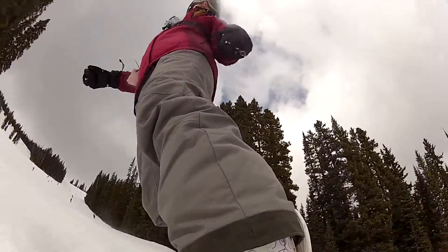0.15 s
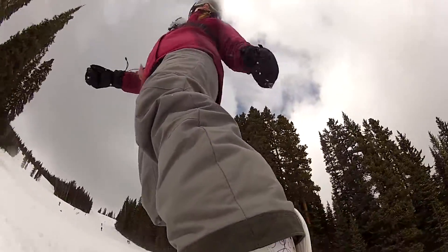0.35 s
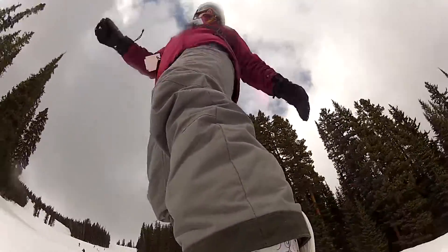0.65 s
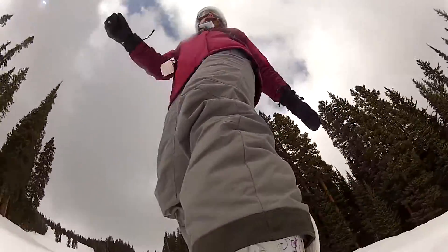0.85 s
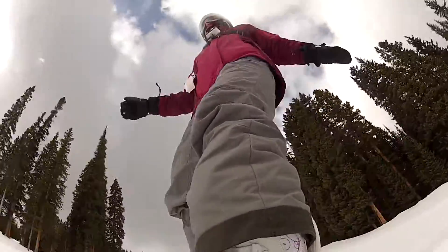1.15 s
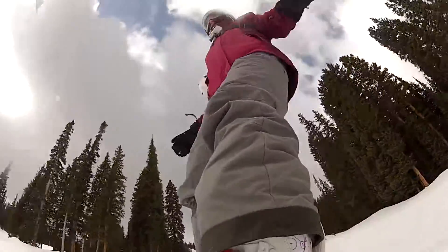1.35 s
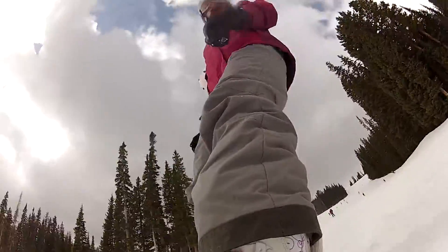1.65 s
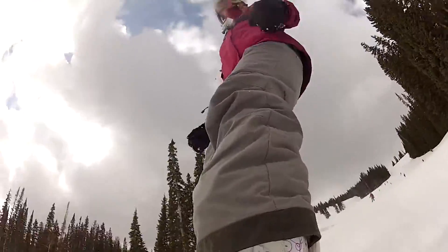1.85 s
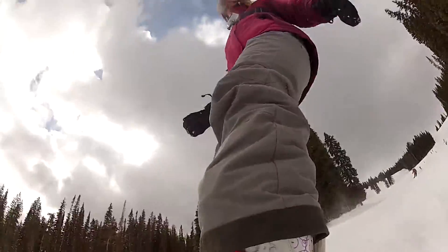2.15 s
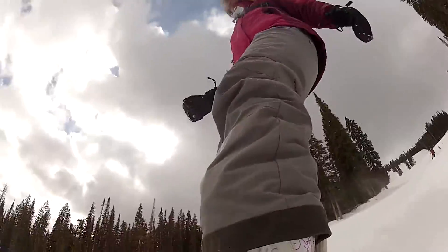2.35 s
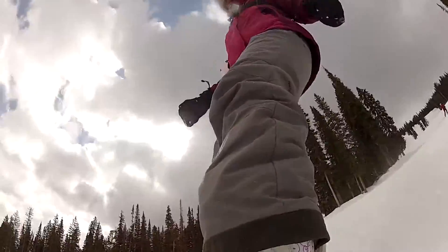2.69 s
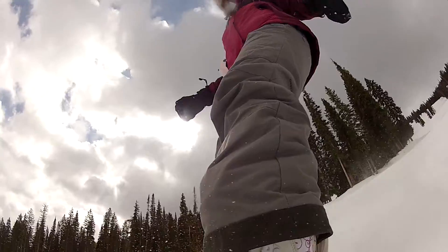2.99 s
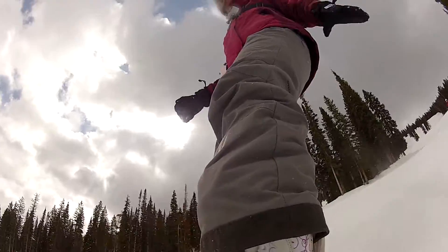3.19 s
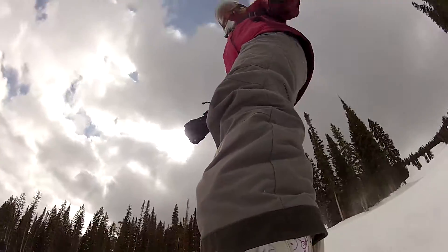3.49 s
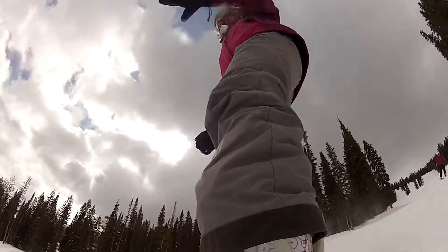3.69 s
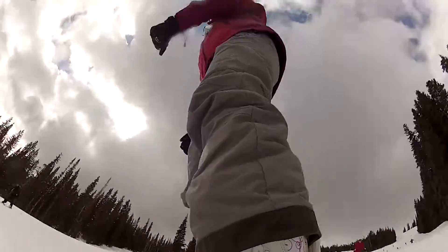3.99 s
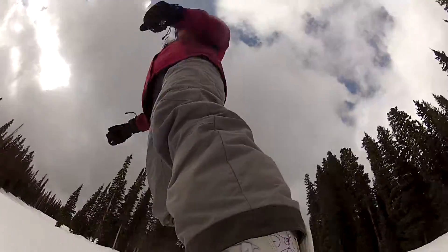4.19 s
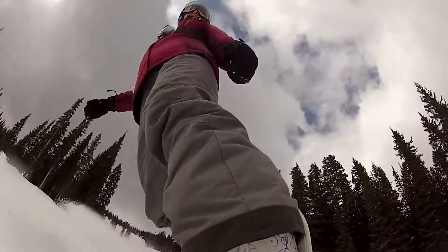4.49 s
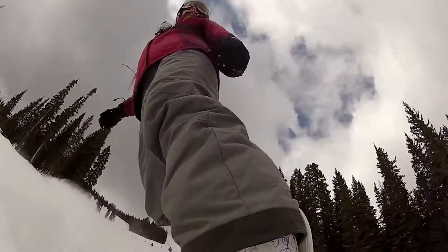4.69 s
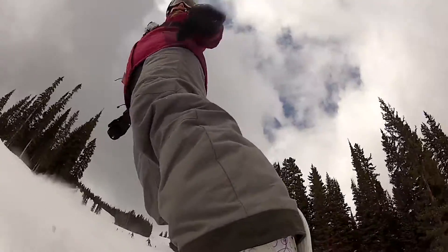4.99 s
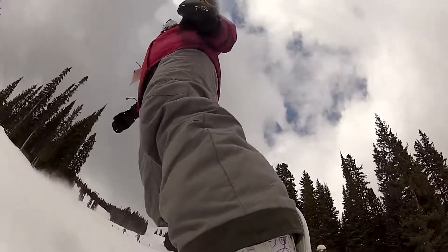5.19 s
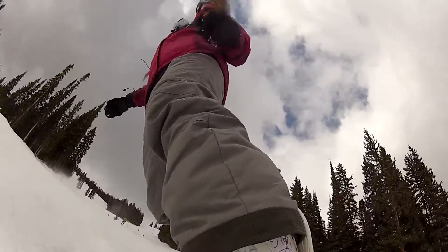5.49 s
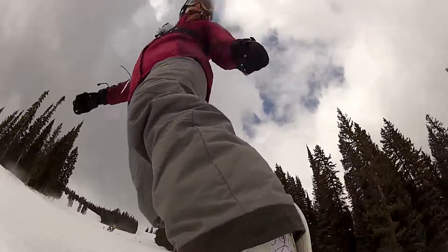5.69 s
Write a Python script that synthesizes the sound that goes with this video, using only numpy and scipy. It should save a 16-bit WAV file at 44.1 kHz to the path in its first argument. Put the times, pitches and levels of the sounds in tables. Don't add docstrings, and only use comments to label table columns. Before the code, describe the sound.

A snowboard edge scrapes harshly over crusty snow, with deep deck rumble, wind buffeting, low thumps and sharp icy clicks, heard from a sealed board-mounted camera.

```python
import sys
import numpy as np
from scipy import signal
from scipy.fft import rfft, irfft, next_fast_len
from scipy.io import wavfile
from scipy.ndimage import uniform_filter1d, minimum_filter1d, map_coordinates

SR = 44100
rng = np.random.default_rng(int(sys.argv[2]) if len(sys.argv) > 2 else 0)


def decibels_to_gain(level_db):
    exponent = np.asarray(level_db, float) / 20
    return 10 ** exponent


def persist_wave(psi):
    counts = np.round(np.clip(psi, -1, 1) * 32767).astype(np.int16)
    wavfile.write(sys.argv[1], SR, np.atleast_2d(counts).T)


N = 257984
TIME = np.arange(N) / SR

# time_s, scrape_db
EDGE_PRESSURE = [(0.0, -19.5), (0.53, -16.5), (1.06, -24), (1.6, -16), (2.13, -20), (2.66, -20),
                 (3.19, -23), (3.72, -21), (4.25, -21), (4.79, -22), (5.32, -20), (5.85, -18.5)]
# start_s, length_s, gain_db
SURGES = [(0.03, 0.018, 1), (0.055, 0.14, 3), (0.845, 0.077, 3), (1.035, 0.026, 13), (1.175, 0.054, 9.5),
          (2.05, 0.067, 2), (2.315, 0.17, 1.5), (2.335, 0.056, 9), (2.435, 0.057, 5.5), (2.59, 0.022, 1),
          (2.87, 0.083, 5.5), (2.885, 0.23, 6), (3.04, 0.12, 3.5), (3.295, 0.14, 5), (3.46, 0.075, 3.5),
          (3.47, 0.13, 4.5), (3.555, 0.041, 0), (3.7, 0.055, 2.5), (3.775, 0.091, 3), (3.875, 0.088, 5.5),
          (4.04, 0.025, 8), (4.34, 0.017, 8.5), (4.46, 0.15, 8), (4.66, 0.028, 6), (4.715, 0.033, 5.5),
          (4.86, 0.025, 1.5), (4.905, 0.022, 4), (5.12, 0.1, 6.5), (5.24, 0.057, 6), (5.395, 0.042, 6)]
# start_s, length_s, loss_db
SKIPS = [(0.31, 0.1, 3), (0.485, 0.059, 4), (0.51, 0.13, 13), (0.62, 0.097, 3.5), (0.94, 0.033, 0.5),
         (1.005, 0.032, 4.5), (1.105, 0.049, 4), (1.355, 0.1, 2), (1.455, 0.063, 12), (1.53, 0.075, 3.5),
         (2.9, 0.033, 6), (4.525, 0.035, 6.5), (5.17, 0.013, 8), (3.535, 0.016, 1), (3.765, 0.017, 3.5),
         (5.615, 0.022, 3), (4.49, 0.011, -1), (1.585, 0.14, 2.5), (1.695, 0.051, 8.5), (1.825, 0.11, 4),
         (1.935, 0.033, 11.5), (2.0, 0.037, 11), (2.245, 0.091, 5.5), (2.79, 0.043, 5.5), (2.86, 0.015, 12),
         (3.17, 0.11, 3.5), (4.02, 0.29, 6.5), (4.065, 0.025, 5.5), (4.2, 0.071, 6.5), (4.365, 0.065, 9.5),
         (4.745, 0.076, 10.5), (4.82, 0.038, 4), (4.93, 0.1, 7), (5.09, 0.019, 8), (5.455, 0.21, 10),
         (5.745, 0.045, 5), (5.805, 0.018, 11)]
# time_s, drum_db
DECK_LOAD = [(0.0, -27.5), (0.45, -23.5), (0.9, -14.5), (1.35, -13.5), (1.8, -14.5), (2.25, -18),
             (2.7, -24), (3.15, -20.5), (3.6, -25.5), (4.05, -17), (4.5, -22), (4.95, -18), (5.4, -29),
             (5.85, -15)]
# start_s, length_s, gain_db
HEAVES = [(0.475, 0.12, -3), (0.67, 0.1, 5), (1.59, 0.099, 1), (1.86, 0.38, 4), (2.185, 0.04, -1),
          (2.22, 0.053, 11.5), (2.36, 0.09, 3), (2.75, 0.064, 4), (2.845, 0.069, 2), (3.21, 0.1, 3.4),
          (3.3, 0.14, 10), (3.655, 0.15, 6), (3.86, 0.076, 4), (4.255, 0.15, 5), (4.435, 0.089, 9.5),
          (5.06, 0.36, 6.5), (5.375, 0.064, 12), (5.565, 0.036, 5), (5.6, 0.097, 4), (5.75, 0.052, 5)]
# start_s, length_s, loss_db
LULLS = [(0.17, 0.069, 5), (0.335, 0.06, 1), (0.58, 0.076, 4), (0.815, 0.16, 3.5), (0.93, 0.11, 11),
         (1.08, 0.037, 13), (1.09, 0.16, 7.5), (1.19, 0.15, 6), (1.385, 0.065, 5.5), (1.47, 0.046, 9),
         (1.51, 0.12, 1), (1.755, 0.079, 6), (1.855, 0.057, 5), (3.0, 0.24, 9), (4.0, 0.12, 13.5),
         (4.11, 0.081, 14), (4.52, 0.15, 1), (4.925, 0.15, 13.5)]
# start_s, length_s, change_db
GUSTS = [(0.0, 0.15, 2.5), (0.08, 0.09, -2), (0.32, 0.1, 1), (0.53, 0.12, 8), (0.775, 0.12, -5),
         (0.85, 0.099, 11.5), (1.065, 0.2, -4), (1.215, 0.14, -0.5), (2.08, 0.15, -8), (2.26, 0.14, 3.5),
         (2.4, 0.27, -2), (1.98, 0.1, -3), (2.955, 0.13, -2.9), (3.14, 0.22, -3), (3.52, 0.33, -5),
         (3.755, 0.36, 3), (4.155, 0.11, -7), (4.225, 0.087, 13), (4.915, 0.058, 8), (4.925, 0.15, 4),
         (5.56, 0.095, 1)]
# time_s, weight_db
LEAN = [(0, -0.5), (.6, -2), (1.2, -3), (1.6, 0.5), (2.1, 2.5), (2.7, 3), (3.2, -1), (3.9, 0), (4.2, -1),
        (4.7, 0.5), (5.3, 0.5), (5.85, 0.5)]
# time_s, extra_brightness_db
CRUST = [(0, -3), (.5, -2.5), (.72, 3.5), (1.0, 2.5), (1.8, -2), (2.4, 0), (2.7, -4), (3.05, 0.5),
         (3.7, -4), (4.2, 3), (4.6, -1), (5.85, -1)]

# start_s, peak_db, ring_hz, knock_db
BUMPS = [(0.69, 1, 86, -29), (0.884, 3.5, 48.4, -36), (0.892, -6, 61, -15), (0.919, 2.5, 145, -38),
         (1.018, 2, 147, -41), (1.05, 8, 109, -40), (1.214, 0, 177, -17), (1.444, 5, 135, -33),
         (1.595, 5, 200, -33), (2.07, 2, 187, -27), (2.045, -5, 260, -27), (2.755, -17, 66.4, -30),
         (3.19, -7, 190, -38), (3.646, -19, 154, -36), (3.971, 1, 190, -34), (4.0938, 4.5, 143, -35),
         (4.211, -1, 187, -37), (4.27, -7, 110, -37), (4.3, 0, 130, -32), (4.329, -1, 185, -33),
         (4.489, -1, 76, -15), (5.059, -15, 68, -36), (5.1, -1.5, 81.6, -24), (5.183, -9, 78.1, -13.5),
         (5.391, -5, 162, -14), (5.51, -5.5, 140, -38), (5.594, 1, 67.6, -31), (5.769, 0, 188, -23),
         (5.781, -1, 75, -30), (0.699, -2, 101, -37), (1.632, -2, 80, -35), (1.693, -0.5, 98, -35),
         (1.922, -1.5, 110, -35), (3.882, -1, 130, -35), (2.47, -3.5, 148, -37), (2.2444, 10.5, 150, -13),
         (4.261, 0, 100, -35), (4.36, -3, 50, -35), (0.74, -3, 59.5, -37), (5.648, -1, 121, -35),
         (4.466, -3, 121, -35)]
# start_s, peak_db, ring_hz, knock_db
ROLLS = [(0.257, -13, 205, -21), (0.304, -7.5, 193, -25), (0.449, -9, 168, -28), (0.505, -4, 183.6, -43),
         (1.343, 6.5, 150.3, -42), (1.3, -2, 157, -42), (0.802, -2, 197, -35), (1.06, -1, 127, -40),
         (1.73, -15, 154, -30), (1.915, 1, 184, -28), (2.211, 0, 155, -33), (2.261, -6.5, 149, -40),
         (3.214, -11, 82.4, -36), (3.33, -2.5, 198, -24), (3.361, -1, 190, -24), (3.873, -1.5, 94.3, -32),
         (4.147, -3.5, 143, -50), (4.453, 1.5, 178.4, -19), (4.644, -7, 175, -22)]
# start_s, peak_db, ring_hz
CHIPS = [(0.7462, -2.5, 1960), (0.8609, -5, 1800), (1.297, -9, 1960), (1.3346, -5.5, 1790),
         (1.5968, -3, 2020), (1.6641, -2.5, 1900), (1.72, -7.5, 1940), (1.8524, -10, 1840),
         (1.927, -5, 1860), (2.0196, -9, 1980), (2.2796, -5, 1830), (2.3213, -9, 1790), (2.454, -6, 1780),
         (2.4728, -5, 1920), (2.589, -6, 1880), (2.6205, -3, 1840), (3.0939, -6, 1970), (3.4126, -7, 2070),
         (3.5773, -4.5, 1854), (3.704, -6, 1810), (3.7559, -3, 1800), (3.8511, -5, 2010),
         (3.9036, -11, 1880), (4.0178, -6, 1930), (4.0986, -12, 1790), (4.1718, -12, 1830),
         (4.1949, -12, 2100), (4.2443, -13, 1960), (4.3195, -6.5, 2100), (4.5194, -4, 2090),
         (4.5461, -6, 2160), (4.868, -7, 2010), (5.013, -7.5, 1900), (5.155, -15, 1820), (5.251, -9, 1880),
         (5.3073, -9, 2100), (5.4081, -2, 2010)]
# start_s, peak_db, gain_dip_db, crack_db
JOLTS = [(0.8992, -2, 4, -26.5), (1.0375, 5, 3, -48), (1.0548, 7, 4, -19), (1.1994, 1, 6, -51),
         (1.2545, 2, -13, -37), (1.4544, -4.5, 10, -29), (1.6402, -1.5, 6, -31), (1.6968, -3, 0, -40),
         (1.8275, 2.5, 8, -44), (1.985, 0, 3, -57), (2.343, 0, 13, -44), (2.374, -17, 0, -51),
         (2.9352, -7, 7, -54), (2.986, -2, -1, -26), (3.394, 8, 12, -25), (3.516, 0, 4, -40),
         (3.737, 1, 6, -54), (4.0533, 5.5, 12, -62), (4.2567, 4, 13, -29.5), (4.352, -1, -6, -45),
         (4.363, -10, 12, -47), (4.5676, -14, 9, -58), (4.9048, 2.5, 0, -36), (4.9235, 4, 0, -24),
         (4.9265, 13.5, 23, -18), (5.7745, -11, -1.5, -42), (5.788, -2, 1, -44), (5.801, -1, -3, -51),
         (5.1835, 4, 5.5, -41), (5.846, -6, 1, -34), (4.4705, -8, 6, -47), (3.337, -18, -2, -52),
         (4.2785, 0, 1, -50)]
# start_s, peak_db
NICKS = [(0.9193, 2), (1.4416, 1.5), (1.512, -1.5), (1.74, -11), (2.038, -8), (2.118, 0), (2.166, -2),
         (2.3615, -12), (2.644, -9), (2.712, -2), (3.5505, -2), (3.78, -7), (3.82, -5), (4.5053, 2),
         (4.726, -16), (5.022, -1), (5.408, -10), (5.5813, -1), (5.632, -9), (5.7245, -6), (5.8267, -1.5)]
# start_s, peak_db, ring_hz
CLACKS = [(0.9, -10, 1200), (1.04, -8, 1280), (1.054, -26, 1310), (1.257, -16, 1380), (1.394, -20, 980),
          (1.449, -13, 1400), (1.513, -25, 1200), (1.73, -17.5, 940), (2.038, -13, 920), (2.162, -12, 1180),
          (2.363, -14, 1250), (2.452, -18, 1190), (2.574, -21, 1000), (2.691, -13, 940), (2.748, -18, 1180),
          (2.932, -29, 1120), (3.246, -23, 810), (3.336, -18, 1150), (3.544, -19, 1220), (3.567, -18, 1180),
          (3.735, -19, 1230), (3.81, -16, 970), (3.886, -23, 1170), (3.919, -18, 1210), (4.098, -28, 945),
          (4.299, -14, 980), (4.351, -15, 955), (4.505, -19, 1020), (4.546, -24, 1210), (4.903, -18, 1160),
          (4.928, -9, 1370), (5.104, -25, 1160), (5.265, -22, 1200), (5.375, -19, 1190), (5.825, -14, 1230)]

# center_hz, width_hz, level_db
CASE_MODES = [(1852, 337, 0), (2106, 283, -0.5), (2313, 120, -9), (3035, 140, -18.5), (3645, 523, -17),
              (4494, 254, -25), (5360, 440, -40)]
# center_hz, width_hz, level_db
RATTLE_MODES = [(648, 224, -12), (804, 70, -5), (939, 120, -1.5), (1053, 150, -5.5), (1203, 150, 0.5),
                (1494, 194, -1.5)]
# center_hz, width_hz, level_db
BUFFET_MODES = [(37, 51, -3), (81, 44, 3)]
# center_hz, width_hz, level_db
DRUM_MODES = [(150.8, 48, 0.5), (192.2, 43, 0.5)]
# center_hz, width_hz, level_db
BUZZ_MODES = [(272.7, 100, 2), (394, 118, 0.5)]
# center_hz, width_hz, level_db
KNOCK_MODES = [(370, 160, -2), (590, 170, -5)]
# center_hz, width_hz, level_db
SPLATTER_MODES = [(5700, 3000, -1), (3700, 2400, 5), (1100, 1400, 5)]

MID_DB = -20
BITE_S, BITE_HZ = 0.0044, 1960


def unit(x):
    return x / np.sqrt(np.mean(x ** 2) + 1e-20)


def curve(rows):
    time_s, value = np.transpose(rows)
    return np.interp(TIME, time_s, value)


def wobble(rate_hz):
    knots = rng.standard_normal(int(N * rate_hz / SR) + 4)
    return map_coordinates(knots, [TIME * rate_hz])


def slips(rate_hz, rise_s):
    releases = (rng.random(N) < rate_hz / SR) * rng.uniform(0.25, 1, size=N)
    decay = np.exp(-1 / (rise_s * SR))
    build = signal.lfilter([1], [1, -decay], releases[::-1])[::-1]
    return unit(build - build.mean())


def humps(rows, skew):
    total = np.zeros(N + SR)
    for start_s, length_s, db in rows:
        u = np.linspace(0, 1, round(length_s * SR))
        total[round(start_s * SR):][:len(u)] += db * np.sin(np.pi * u ** skew)
    return total[:N]


def lowpass(x, order, cutoff_hz):
    return signal.sosfilt(signal.butter(N=order, Wn=cutoff_hz, fs=SR, output="sos"), x)


def ring(x, modes):
    size = next_fast_len(N + SR // 2, real=True) // 2 * 2
    f = np.fft.rfftfreq(size, 1 / SR)
    power = 0
    for center_hz, width_hz, db in modes:
        damping = (f * width_hz) ** 2
        single = damping / ((center_hz ** 2 - f * f) ** 2 + damping)
        power = power + decibels_to_gain(db) ** 2 * single ** 2
    cepstrum = irfft(np.log(power + 1e-12) / 2, size)
    fold = np.r_[1, 2 * np.ones(size // 2 - 1), 1, np.zeros(size // 2 - 1)]
    return irfft(rfft(x, size) * np.exp(rfft(cepstrum * fold)), size)[:N]


def shaken(lumps_db, modes):
    return unit(ring(decibels_to_gain(lumps_db) * rng.standard_normal(N), modes))


def patchy(x, depth_db):
    z = signal.stft(x, nperseg=256)[2]
    field = uniform_filter1d(rng.standard_normal(z.shape), size=4, axis=0)
    field = uniform_filter1d(field, size=7, axis=1)
    return unit(signal.istft(z * decibels_to_gain(depth_db * unit(field)), nperseg=256)[1][:N])


def edge_pressure_db():
    return curve(EDGE_PRESSURE) + humps(SURGES, 1.27) - humps(SKIPS, 0.68) - MID_DB


def deck_load_db():
    return curve(DECK_LOAD) + humps(HEAVES, 1.44) - humps(LULLS, 0.91) - MID_DB


def crystal_clumps_db():
    return 0.52 * slips(54, 0.066) + 1.4 * slips(110, 0.0038) + 0.23 * wobble(60) + 1.34 * wobble(230)


def scrape(clumps_db):
    press_db = edge_pressure_db()
    noise = patchy(shaken(clumps_db + 0.66 * wobble(900), CASE_MODES), depth_db=1.2)
    noise = decibels_to_gain(press_db - 19.5) * noise
    bright_db = curve(CRUST) + 0.18 * press_db + 0.87 * wobble(14)
    return noise + ring(noise, [(4270, 3600, 0)]) * (decibels_to_gain(bright_db) - 1)


def rattle(clumps_db):
    level_db = -31.5 + 0.8 * edge_pressure_db() + 0.35 * deck_load_db() + curve(LEAN)
    return decibels_to_gain(level_db) * shaken(1.01 * clumps_db + 0.98 * wobble(40), RATTLE_MODES)


def rumble(lumps_db):
    load_db = deck_load_db()
    buffet = decibels_to_gain(load_db - 21 + humps(GUSTS, 0.84)) * shaken(lumps_db, BUFFET_MODES)
    drum = decibels_to_gain(load_db - 20) * shaken(lumps_db + 1.2 * wobble(24.76), DRUM_MODES)
    low, stiff = buffet + drum, 0.8
    return low / (1 + np.abs(low / stiff) ** 3) ** (1 / 3)


def buzz(lumps_db):
    level_db = -34 + 0.54 * edge_pressure_db() + 0.47 * deck_load_db() + curve(LEAN)
    return lowpass(decibels_to_gain(level_db) * shaken(0.62 * lumps_db + 1.3 * wobble(60), BUZZ_MODES), 6, 482)


def preamp_hiss():
    return decibels_to_gain(-59) * shaken(1.9 * wobble(27), [(4130, 1900, 0)])


def slaps():
    total, t = np.zeros(N + SR), np.arange(SR // 8) / SR
    for rows, cycles in ((BUMPS, 2.08), (ROLLS, 4.2)):
        for start_s, db, hz, knock_db in rows:
            u = t * hz / cycles
            swell = u * np.exp(-2.5 * u ** 0.99)
            total[round(start_s * SR):][:len(t)] += decibels_to_gain(db + 9) * swell * np.sin(2 * np.pi * hz * t)
    return total[:N]


def knocks():
    length_s, lag_s, blow_lag_s = 0.0079, 0.0024, 0.00496
    total, t = np.zeros(N + SR), np.arange(SR // 8) / SR
    swell = np.sin(np.pi * np.clip((t - lag_s) / length_s, 0, 1)) ** 2
    for start_s, db, hz, knock_db in list(BUMPS) + list(ROLLS):
        grit = rng.standard_normal(len(t))
        total[round(start_s * SR):][:len(t)] += decibels_to_gain(knock_db) * unit(grit * swell)
        total[round((start_s + blow_lag_s) * SR)] += decibels_to_gain(knock_db + 30.5)
    return ring(total[:N], KNOCK_MODES)


def bottomed(swing):
    limit = 1.05
    return swing / (1 + np.abs(swing / limit) ** 6) ** (1 / 6)


def flecks(rows, length_s, trim_db):
    total, t = np.zeros(N + SR), np.arange(SR // 50) / SR
    swell = np.sin(np.pi * np.clip(t / length_s, 0, 1)) ** 0.77
    for start_s, db, hz in rows:
        wander_rad = 0.069 * np.cumsum(rng.standard_normal(len(t)))
        tone = np.sin(2 * np.pi * hz * t + wander_rad)
        total[round((start_s - length_s / 4) * SR):][:len(t)] += decibels_to_gain(db + trim_db) * swell * tone
    return lowpass(total[:N], 4, 3200)


def chips():
    return flecks(CHIPS, length_s=0.00628, trim_db=-5)


def all_bites():
    return list(JOLTS) + [(start_s, db, 0, -66) for start_s, db in NICKS]


def bites():
    total, t = np.zeros(N + SR), np.arange(SR // 50) / SR
    swell = np.sin(np.pi * np.clip(t / BITE_S, 0, 1))
    for start_s, db, dip_db, crack_db in all_bites():
        grit = rng.standard_normal(len(t))
        push = np.sin(2 * np.pi * BITE_HZ * t) + 0.5 * unit(grit * swell)
        total[round(start_s * SR):][:len(t)] += decibels_to_gain(db - 6) * swell ** 0.85 * push
    quiet_mount = [(hz, width_hz, db - 8) for hz, width_hz, db in RATTLE_MODES]
    return ring(total[:N], list(CASE_MODES) + quiet_mount)


def cracks():
    total, t = np.zeros(N + SR), np.arange(SR // 50) / SR
    swell = np.sin(np.pi * np.clip(t / BITE_S, 0, 1)) ** 5.8
    for start_s, db, dip_db, crack_db in all_bites():
        overtone = 0.4 * decibels_to_gain(0.8 * db) * np.cos(3 * 2 * np.pi * BITE_HZ * t)
        flats = overtone + rng.standard_normal(len(t))
        total[round(start_s * SR):][:len(t)] += decibels_to_gain(crack_db - 4) * unit(swell * flats)
    return ring(total[:N], SPLATTER_MODES)


def clacks():
    return flecks(CLACKS, length_s=0.0079, trim_db=-6.5)


def scene():
    clumps_db = crystal_clumps_db()
    lumps_db = 1.1 * wobble(6.3) + 0.31 * wobble(35)
    sealed = lowpass(scrape(clumps_db) + rattle(clumps_db) + bites(), 8, 5650)
    deck = buzz(lumps_db) + bottomed(rumble(lumps_db) + slaps()) + knocks()
    return (sealed + cracks() + deck + chips() + clacks())[None]


def ducking():
    dip_curve_db, since_s = np.zeros(N + SR), np.arange(SR // 8) / SR
    for start_s, db, dip_db, crack_db in all_bites():
        recovery = np.exp(-since_s / 0.009)
        dip_curve_db[round((start_s + BITE_S) * SR):][:len(since_s)] -= abs(dip_db) * recovery
    return decibels_to_gain(uniform_filter1d(dip_curve_db[:N], size=SR // 500))


def limited(x):
    ceiling, grab_s = 1.03, 0.004
    size = round(grab_s * SR)
    need = minimum_filter1d(np.minimum(1, ceiling / (np.abs(x) + 1e-9)), size=size)
    gain = uniform_filter1d(uniform_filter1d(need, size=size // 2), size=size // 2)
    return x * gain


def held(x):
    hold_hz, top_hz, leak_db = 12000, 15300, -26
    seconds = -(-N // SR)
    coarse = map_coordinates(x, [np.arange(seconds * hold_hz) * SR / hold_hz])
    hz = np.fft.rfftfreq(seconds * SR, 1 / SR)
    images = np.resize(np.fft.fft(coarse), len(hz))
    images = images * np.sinc(hz / hold_hz) * np.where(hz < top_hz, 1, decibels_to_gain(leak_db))
    return irfft(images, seconds * SR)[:N] * SR / hold_hz


def band_limit(x):
    return signal.sosfilt(signal.butter(12, 15760, fs=SR, output="sos"), x)


def record(dry):
    x = limited((dry[0] + preamp_hiss()) * ducking())
    mix = np.clip(held(x), -1, 1)[None]
    return band_limit(mix)


dry = scene()
out = record(dry)
persist_wave(out)
```